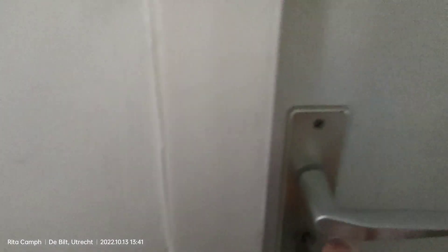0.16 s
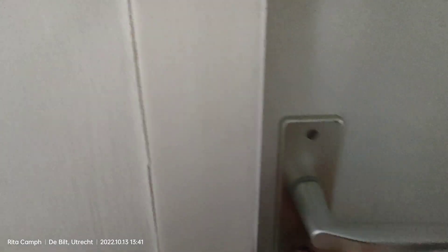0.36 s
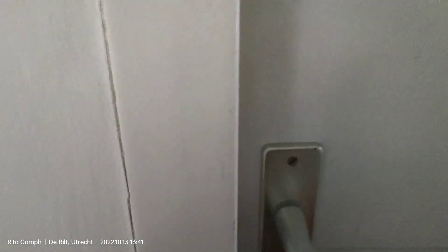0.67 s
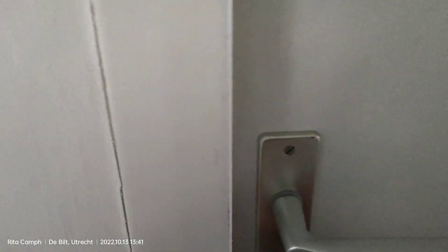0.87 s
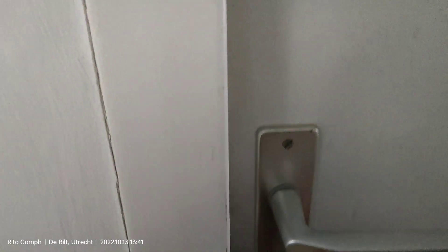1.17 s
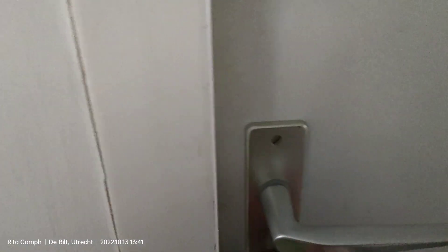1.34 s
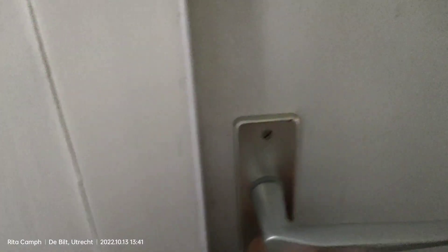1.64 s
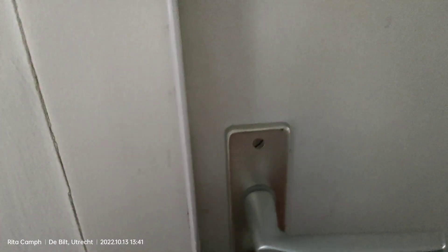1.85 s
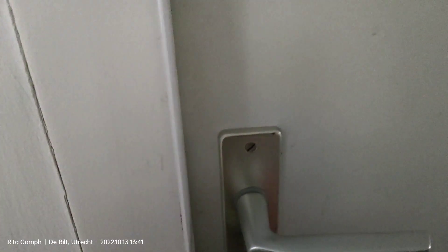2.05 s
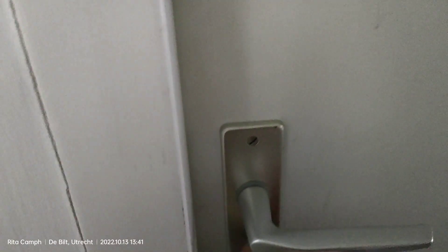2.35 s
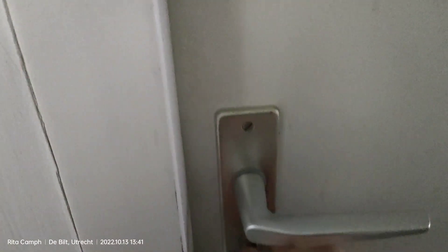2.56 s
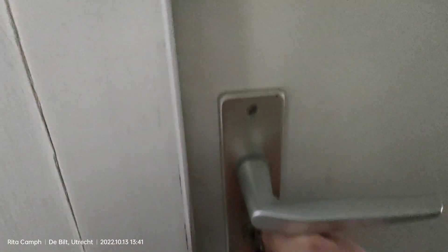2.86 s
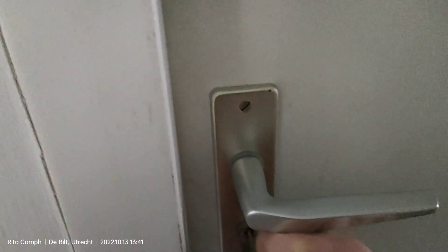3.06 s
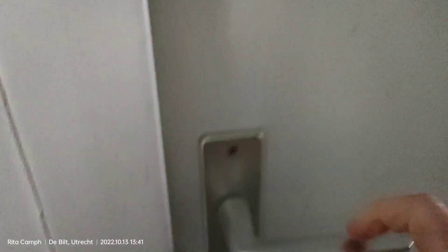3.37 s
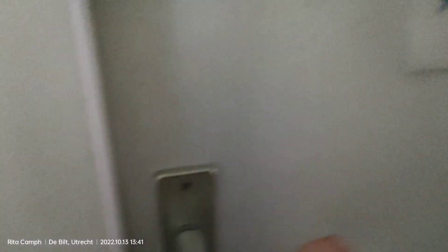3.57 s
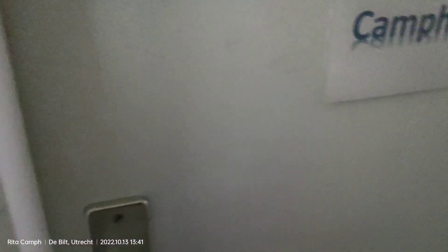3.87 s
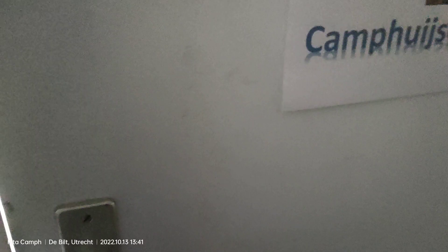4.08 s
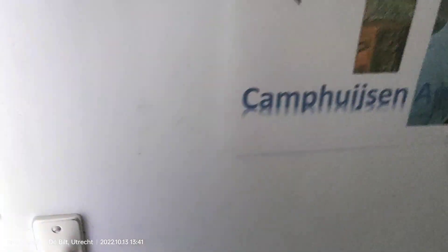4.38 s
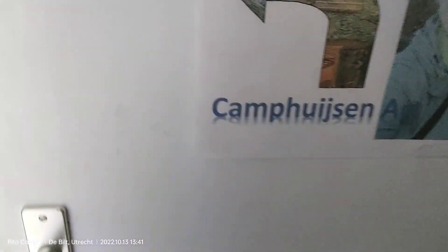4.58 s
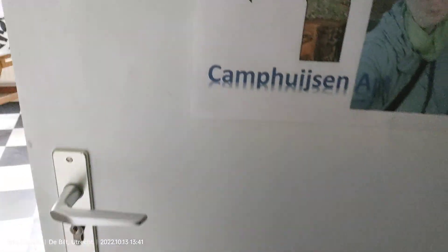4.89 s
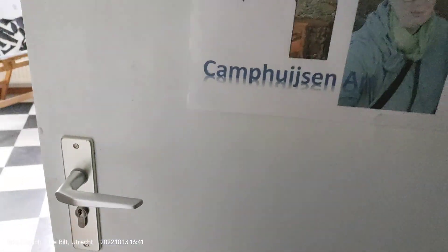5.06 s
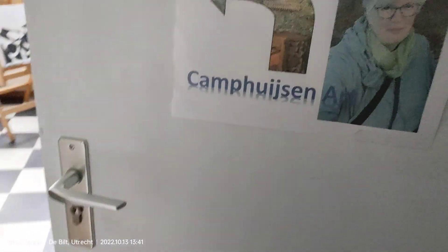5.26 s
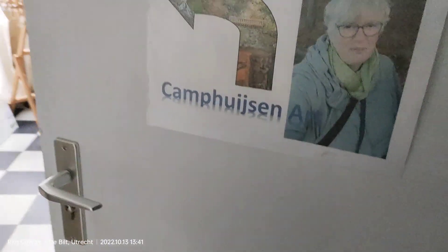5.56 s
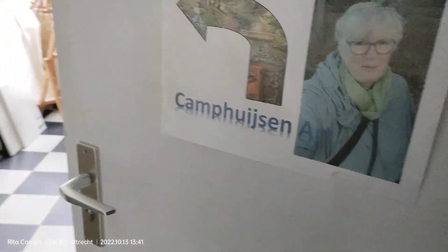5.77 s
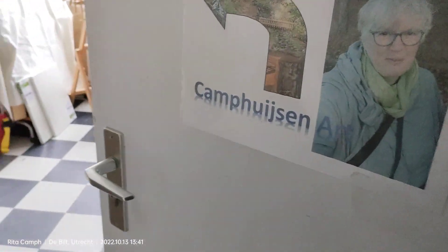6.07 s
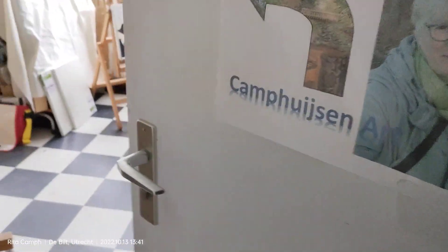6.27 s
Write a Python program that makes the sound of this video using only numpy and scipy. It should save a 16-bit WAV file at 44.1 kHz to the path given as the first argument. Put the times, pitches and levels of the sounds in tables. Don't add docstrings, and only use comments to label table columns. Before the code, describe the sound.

Close to the microphone in a hard hallway, a key scrapes and clicks in a door lock while the rest of the bunch jingles brightly. The bolt snaps loudly, then the latch cracks twice. After a quieter fumble, more clanks and hollow thuds free the door. Keys tinkle softly as it swings, ending with a low bump.

```python
import sys
import numpy as np
from scipy import signal
from scipy.fft import rfft, irfft
from scipy.io import wavfile
from scipy.ndimage import uniform_filter1d, minimum_filter1d

SR = 44100
rng = np.random.default_rng(int(sys.argv[2]) if len(sys.argv) > 2 else 0)


def convert_level_to_amplitude(level_db):
    exponent = np.asarray(level_db, float) / 20
    return 10 ** exponent


def persist_wave(psi):
    counts = np.round(np.clip(psi, -1, 1) * 32767).astype(np.int16)
    wavfile.write(sys.argv[1], SR, np.atleast_2d(counts).T)


N = 283563


def evened(x):
    return x / np.sqrt(np.mean(x ** 2) + 1e-20)


def noise(length):
    return rng.standard_normal((2, length))


def tone(hz, t):
    return np.sin(2 * np.pi * hz * t)


def read(points, hz):
    f, value = np.transpose(points)
    return np.interp(np.log(hz + 1), np.log(f + 1), value)


def add(mix, s, sound):
    part = mix[:, round(s * SR):][:, :sound.shape[1]]
    part += sound[:, :part.shape[1]]


def add_peak(mix, s, db, sound):
    add(mix, s, convert_level_to_amplitude(db) * sound / abs(sound).max())


def sides(pan_db):
    return convert_level_to_amplitude(np.array([[.5], [-.5]]) * pan_db)


def coloured(x, spectrum):
    size = x.shape[-1]
    return irfft(rfft(x) * convert_level_to_amplitude(read(spectrum, np.fft.rfftfreq(size, 1 / SR))), size)


# (frequency [Hz], correlation [-1..1])
LIKENESS = [(100, 0.95), (400, 0.91), (900, 0.31), (3000, 0.087), (12000, 0.025)]


def paired(z):
    size = z.shape[-1]
    same = np.clip(read(LIKENESS, np.fft.rfftfreq(size, 1 / SR)), -1, 1)
    left, other = rfft(z)
    return irfft(np.array([left, same * left + np.sqrt(1 - same ** 2) * other]), size)


def resonate(x, hz, width_hz):
    return signal.lfilter(*signal.iirpeak(min(hz, SR / 2.2), hz / width_hz, SR), x)


def body(x, peaks):
    return sum(convert_level_to_amplitude(db) * resonate(x, hz, width_hz) for hz, width_hz, db in peaks)


def fade(t, t60_s, rise_s):
    return convert_level_to_amplitude(-60 * t / max(t60_s, .004)) * (1 - np.exp(-t / rise_s))


def grains(per_s, spread_db):
    size = convert_level_to_amplitude(spread_db * np.minimum(rng.exponential(1, N), 4))
    return size * (rng.random(N) < per_s / SR) * rng.choice([-1, 1], N)


def convolved(clicks, response):
    return signal.oaconvolve(clicks[None], response, axes=1)[:, :N]


def patchy(x, depth_db):
    z = signal.stft(x, nperseg=512)[2]
    spots = uniform_filter1d(rng.standard_normal(z.shape[1:]), size=3, axis=0)
    spots = evened(uniform_filter1d(spots, size=12, axis=1))
    return signal.istft(z * convert_level_to_amplitude(depth_db * spots), nperseg=512)[1][:, :N]


# (time [s], effort as scrape level [dB], swing of the bunch as jingle level [dB])
HANDLING = [(0.0, -61.5, -88), (.2, -67, -65), (.43, -50.5, -90), (.72, -45.5, -39.5), (1.16, -47, -68.5),
            (1.63, -44.5, -44), (2.06, -57, -65), (2.4, -41, -56), (2.69, -64.5, -68), (3.009, -66, -83),
            (3.29, -50.5, -56.5), (3.89, -54.5, -46), (4.06, -42, -56), (4.6, -60, -68),
            (5.05, -54.5, -58.5), (5.44, -56, -65), (5.73, -53, -56), (6.3, -64.5, -68.5)]


def hand(column):
    rows = np.transpose(HANDLING)
    return convert_level_to_amplitude(np.interp(np.arange(N) / SR, rows[0], rows[column]))


# (frequency [Hz], level [dB])
AIR = [(20, -47), (123, -7), (190, 10), (384, -59), (840, -12), (3720, -18), (7920, -77), (11000, -62.5)]
AIR_DB = -60.5
HUM_HZ, HUM_DB = 78, -72.5


def air():
    hum = resonate(resonate(rng.standard_normal(N), HUM_HZ, 22), HUM_HZ, 30)
    hiss = coloured(paired(noise(N)), AIR)
    return convert_level_to_amplitude(AIR_DB) * evened(hiss) + convert_level_to_amplitude(HUM_DB) * evened(hum)


# (frequency [Hz], density [dB per Hz])
SCRAPE = [(290, -2.5), (500, -4.5), (1480, 1.5), (1870, -8), (3100, 1.5), (7070, -3.5), (7970, -15.5),
          (11700, -70)]
RUB_FLOOR = .45


def scrape():
    slips = signal.lfilter([1], [1, -.992], abs(grains(per_s=200, spread_db=3.5)))
    clumps = convert_level_to_amplitude(2.5 * evened(uniform_filter1d(rng.standard_normal(N), size=2500)))
    rub = coloured(paired(noise(N)) * clumps * (RUB_FLOOR + evened(slips)), SCRAPE)
    t, late_rad = np.arange(900) / SR, np.array([[0], [1.3]])
    pings = np.zeros((2, N))
    for k, hz in enumerate(np.geomspace(1900, 6500, num=30)):
        ping = fade(t, 0.0035, 0.0001) * np.sin(2 * np.pi * hz * t - k * late_rad)
        pings += convolved(grains(per_s=14, spread_db=0.5), ping)
    pings = evened(pings)
    return hand(1) * evened(evened(rub) + 0.24 * pings) + 0.45 * hand(2) * pings


# (frequency [Hz], width [Hz], level [dB])
PANEL = [(147.3, 3.9, -3), (192.7, 52.5, -3.5), (271, 78, -8), (388, 18, -9), (580, 380, -17.5)]
FIRM = signal.butter(4, 132, "high", fs=SR)
RUMBLE_DB, RUMBLE_FALL_DB_PER_S = 1.5, 1.43


def rumble():
    jolts = signal.lfilter([1], [1, -.998], abs(grains(per_s=60, spread_db=2.5)))
    leaf = body(paired(noise(N)) * (0.63 + evened(jolts)), PANEL)
    level_db = RUMBLE_DB - RUMBLE_FALL_DB_PER_S * np.arange(N) / SR
    return hand(1) * convert_level_to_amplitude(level_db) * evened(signal.lfilter(*FIRM, leaf))


# (time [s], peak level [dB], strongest frequency [Hz])
THUDS = [(0.243, -29, 202), (0.298, -32, 245), (.4, -28.5, 206), (.453, -24.5, 191), (0.714, -29, 184),
         (0.811, -34, 186), (1.858, -36, 220), (2.13, -27, 252), (2.241, -12.5, 383), (2.283, -24, 424),
         (2.423, -24.5, 425), (2.56, -30.5, 151), (2.772, -35, 200), (3.044, -26, 216), (3.201, -21.5, 190),
         (3.484, -31.5, 143), (3.699, -32.5, 188), (3.859, -20.5, 330), (3.897, -17, 151.5),
         (4.003, -22, 198), (4.328, -19.5, 272), (6.271, -23, 304), (.005, -35, 208), (3.62, -33, 182),
         (0.34, -44, 277)]
BOOM_T60_S = 0.096


def thuds():
    out, t = np.zeros((2, N)), np.arange(14000) / SR
    for s, db, hz in THUDS:
        push = paired(noise(len(t))) * fade(t, BOOM_T60_S, 0.013)
        boom = evened(body(push, PANEL)) + 0.5 * evened(resonate(resonate(push, hz, 82), hz, 180))
        boom = boom + 4.34 * fade(t, 1.37 * BOOM_T60_S, 0.0013) * tone(hz, t)
        add_peak(out, s - .004, db, signal.lfilter(*FIRM, boom))
    return out


# (frequency [Hz], ..)
KEY_HZ = [
    [6783, 12030],
    [9985, 3195, 14110, 9915, 10075],
    [14390, 8312, 13980],
    [7245, 11170, 13750, 15260],
    [15400, 15480, 8020, 15340],
    [4667, 2186],
    [10150, 10090],
]
# (level [dB], t60 [s])
KEY_RING = [
    [(-2.5, 0.17), (-23, 0.36)],
    [(-2, 0.14), (-6, 0.11), (-16.5, 0.17), (-15.5, 0.08), (-6.5, 0.11)],
    [(3, 0.19), (-25.5, 0.49), (5, 0.12)],
    [(6, 0.058), (-11, 0.47), (-12.5, 0.33), (-35.5, 0.32)],
    [(-2.5, 0.3), (1, .12), (-15.5, 1), (-11, 0.23)],
    [(-6.5, 0.92), (-11, 0.47)],
    [(-12.5, 0.27), (-10, 0.59)],
]
# (left-right level [dB], lag of the right port [samples])
KEY_PLACE = [(2, 2.7), (5.5, 0.17), (3.5, 0.32), (3.5, 1.3), (-2, 5.1), (9.5, 5.4), (6, 1.2)]


def key_ring(order, length):
    t, (pan_db, lag) = np.arange(length) / SR, KEY_PLACE[order]
    hz = np.array(KEY_HZ[order])[:, None, None]
    db, t60_s = np.transpose(KEY_RING[order])[:, :, None, None]
    spot, turn, sway = rng.standard_normal((3, len(hz), 1, 1))
    spot[0] = 0
    late_rad = np.array([[0], [1]]) * (2 * np.pi * hz * lag / SR + 1.6 * turn)
    flutter_db = 2.5 * np.sin(turn + (170 + 70 * sway) * t)
    level = convert_level_to_amplitude(db + 2 * spot + flutter_db - 60 * t / t60_s)
    return sides(pan_db) * (level * np.sin(2 * np.pi * hz * t - late_rad)).sum(0)


BRIGHT = signal.butter(2, [6500, 15600], "band", fs=SR)
# (level [dB], ..)
JINGLE_DB = (-1, -0.5, -5.5, -4)


def jingle():
    touches = np.array([grains(per_s=40, spread_db=3.) for _ in range(4)])
    damped = convert_level_to_amplitude(-300 * np.arange(4000) / SR)
    rings = sum(convolved(x, convert_level_to_amplitude(JINGLE_DB[k]) * damped * key_ring(k, 4000)) for k, x in enumerate(touches))
    rustle = evened(signal.lfilter([1], [1, -.998], abs(touches).sum(0)))
    fizz = signal.lfilter(*BRIGHT, paired(noise(N)) * rustle)
    blurred_hz = [modes[0] for modes in KEY_HZ] + list(KEY_HZ[3])
    fizz = evened(fizz) + 0.88 * evened(body(fizz, [(hz, 260, 0) for hz in blurred_hz]))
    return hand(2) * evened(0.5 * evened(rings) + evened(patchy(fizz, depth_db=7.5)))


# (frequency [Hz], density [dB per Hz])
SNAP = [(710, -15.5), (1200, -5), (2170, 0.5), (2890, 3), (6220, -2), (14000, -69.5), (16500, -9.5)]
# (time [s], peak level [dB], brightest frequency [Hz])
TURN = [(.1413, -38.5, 3870), (.2475, -23, 2340), (.4, -29, 3380), (.4467, -17, 3470), (.506, -25.5, 3820),
        (.5588, -23, 1970), (.5832, -20.5, 5090), (.6156, -18, 3120), (.6427, -19, 5500),
        (.7055, -15, 5800), (.779, -20.5, 3720), (.9895, -38, 3600), (1.0186, -20.5, 3340),
        (1.0796, -17, 2620), (1.1251, -22, 2200), (1.2112, -0.5, 2330), (1.3274, -19, 2230),
        (1.3821, -23.5, 3200), (1.437, -20, 5400), (1.473, -22, 3730), (1.6367, -28, 3560),
        (1.6724, -23, 3500), (1.8602, -18.5, 2400)]
# (time [s], peak level [dB], brightest frequency [Hz])
LATCH = [(2.1124, -16, 2430), (2.2306, -6, 2320), (2.241, -3, 5100), (2.4033, -15.5, 2440),
         (2.4308, -11, 3270), (2.5526, -25, 3080), (2.5665, -23.5, 2690), (2.8706, -43, 3700),
         (2.9868, -36, 4100), (3.0473, -22.5, 2500), (3.2083, -20, 2600), (3.3356, -36, 3170),
         (3.6216, -14, 6650), (3.738, -36, 2780), (3.862, -10.5, 5400), (3.9, -15, 3820),
         (4.009, -12, 2090), (4.1598, -26.5, 3200), (4.3185, -19.5, 4580), (4.3278, -11.5, 2700)]
# (time [s], peak level [dB], brightest frequency [Hz])
SWAY = [(4.5705, -32.5, 3260), (4.6968, -28, 6930), (4.777, -29.5, 4040), (4.874, -27, 6350),
        (4.8954, -20.5, 5370), (4.923, -28.5, 4820), (4.935, -25, 5560), (5.1063, -32.5, 6330),
        (5.1657, -29, 4830), (5.2744, -38, 6100), (5.3767, -33, 5600), (5.4029, -27.5, 5800),
        (5.5016, -33, 2580), (5.5887, -32, 2890), (5.6265, -20.5, 5500), (5.6954, -25.5, 5600),
        (5.7364, -30, 4440), (5.769, -34, 3850), (6.2951, -27, 5530), (6.356, -29.5, 2630)]
LOCK_LEFT_DB, LEFT_SPREAD_DB = 3.5, 1
SPIKE_T60_S = .014


def cracks():
    out, t = np.zeros((2, N)), np.arange(6000) / SR
    for s, db, hz in list(TURN) + list(LATCH) + list(SWAY):
        pan_db = LOCK_LEFT_DB + LEFT_SPREAD_DB * rng.standard_normal()
        z = paired(noise(len(t)))
        crack = evened(coloured(z, SNAP)) + 0.62 * evened(resonate(z, hz, 0.34 * hz))
        chatter = evened(uniform_filter1d(rng.standard_normal(len(t)), size=70))
        rattle = convert_level_to_amplitude(8.45 * np.minimum(t / 0.0066, 1) * chatter)
        tail = 0.56 * convert_level_to_amplitude(0.52 * db) * fade(t, 0.065 + 0.00037 * db, 0.00026)
        crack = crack * rattle * (fade(t, SPIKE_T60_S, 0.0013) + tail)
        crack = crack + 3 * fade(t, .006, .0002) * tone(hz, t)
        add(out, s - .0008, sides(pan_db) * convert_level_to_amplitude(db) * crack / abs(crack).max())
    return out


# (time [s], peak level [dB], pitch [Hz], left-right level [dB])
TICKS = [(0.3254, -45, 4130, -13), (0.3356, -39, 3330, 3), (0.377, -53, 3540, -3), (0.417, -27.5, 3960, -6),
         (0.6689, -26, 2070, 1), (0.831, -23, 4600, 1), (0.8786, -37, 4700, 5), (0.9047, -34, 3180, 12),
         (0.9753, -51, 3740, 2.0), (1.1624, -30, 5000, 0), (1.1732, -23, 3060, 4), (1.3414, -20, 2180, 4),
         (1.3564, -27, 2820, 13), (1.3994, -36, 3700, 5.0), (1.6262, -31, 3400, 0),
         (1.7402, -20.5, 4900, 5.5), (1.7944, -41, 4670, 5.5), (1.8654, -18.5, 2220, 15),
         (2.0305, -46, 3150, 7), (2.0803, -33.5, 3230, 8), (2.802, -49, 3860, 7.5),
         (3.0528, -25.5, 2380, 15), (3.128, -38, 3200, 7), (3.156, -42, 4500, 4), (3.2214, -17.5, 2250, 0),
         (3.252, -22, 2200, 2), (3.347, -46, 3120, 3.0), (3.369, -30.5, 3890, 5), (3.4372, -31.5, 5560, 13),
         (3.486, -43, 2920, 6), (3.5186, -32.5, 2880, 5), (3.7977, -34, 3740, 9), (4.138, -42, 3150, 2),
         (4.209, -24, 2590, 5), (4.3034, -30, 3800, 11)]
# (time [s], peak level [dB], pitch [Hz], left-right level [dB])
DANGLE = [(4.407, -30.5, 5730, 13), (4.473, -47, 2520, 10), (4.5141, -41.5, 3650, 12),
          (4.6144, -39, 3220, 15), (4.7944, -37, 4530, 8.5), (4.8094, -44, 4770, 6), (4.8564, -43, 6200, 7),
          (4.975, -46, 5640, 1.5), (5.009, -36.5, 5630, 3), (5.0304, -43, 5460, 9), (5.0754, -38, 2200, 5),
          (5.203, -34, 6300, 1), (5.2834, -39, 3630, 3), (5.3183, -48, 4700, 9), (5.364, -42, 4720, 8),
          (5.4365, -43, 2980, 12), (5.542, -36, 2460, 13), (5.5503, -41, 2520, 9), (5.6054, -46, 5440, -2),
          (5.6403, -29.5, 5200, -3), (5.7108, -27.5, 2870, 11), (5.7502, -35, 5550, 6),
          (5.78, -39, 3980, 4), (5.8646, -42, 2420, 7), (5.901, -38, 3100, 5), (5.9934, -36, 3150, 3),
          (6.0247, -35.5, 3080, 2), (6.052, -36.5, 5600, 2), (6.133, -43, 3550, 8), (6.2606, -40, 2170, 5),
          (6.402, -33.5, 5950, -3.0)]
# (time [s], peak level [dB], pitch [Hz], left-right level [dB])
LEADS = [(.431, -24, 2180, -2), (1.071, -21, 3020, -3), (1.2084, -12, 2270, -4), (1.856, -23.5, 3270, 6),
         (2.102, -24, 3030, 1), (2.881, -49, 994, -8), (2.939, -42.5, 1440, -13), (3.041, -26, 2770, -9),
         (3.708, -27.5, 1150, 5), (0.2476, -24, 2590, -16), (0.9894, -18.5, 3750, 4.5),
         (3.3347, -25, 3300, 7), (3.7381, -26.5, 2940, 9), (4.8742, -34, 5100, -4), (5.402, -47, 5770, -7)]
TICK_T60_S, TICK_TAIL, TICK_DB = .007, .25, 1


def ticks():
    out, t = np.zeros((2, N)), np.arange(3000) / SR
    for s, db, hz, pan_db in list(TICKS) + list(DANGLE) + list(LEADS):
        snap = evened(coloured(paired(noise(len(t))), SNAP))
        snap = snap * (0.5 * fade(t, 0.0039, .0001) + TICK_TAIL * fade(t, 0.04, 0.004))
        tick = snap + fade(t, TICK_T60_S, 0.0004) * tone(hz, t)
        add(out, s - .0008, sides(pan_db) * convert_level_to_amplitude(db + TICK_DB) * tick / abs(tick).max())
    return out


# (frequency [Hz], width [Hz], level [dB])
CASE = [(640, 320, -7), (914, 220, -2), (1390, 210, -8)]
# (time [s], peak level [dB], strongest frequency [Hz])
KNOCKS = [(0.447, -26, 800), (1.08, -27.5, 710), (1.21, -9, 1630), (1.327, -19, 910), (1.473, -19.5, 860),
          (1.866, -24.5, 1450), (2.117, -23.5, 1144), (2.245, -10, 980), (2.404, -22, 1560),
          (2.43, -8.5, 795), (6.275, -33.5, 860), (2.936, -50, 589), (3.049, -22, 650),
          (3.209, -23.5, 1370), (3.619, -34, 780), (3.703, -33.5, 647), (3.861, -21.5, 503),
          (3.903, -14.5, 944), (4.007, -11.5, 875), (4.325, -19, 670)]


def knocks():
    out, t = np.zeros((2, N)), np.arange(6000) / SR
    for s, db, hz in KNOCKS:
        push = paired(noise(len(t))) * (fade(t, 0.045, 0.00082) + 0.1 * fade(t, 0.15, 0.0026))
        ring = evened(body(push, CASE)) + 0.25 * evened(resonate(push, hz, hz / 7))
        ring = ring + 18 * fade(t, 0.013, 0.0012) * tone(hz, t)
        add_peak(out, s - .001, db, ring)
    return out


# (time [s], peak level [dB])
SHOVES = [
    (0.45, -36),
    (0.732, -44),
    (3.043, -49),
    (3.204, -34),
    (3.701, -45),
    (4.004, -23),
    (6.281, -29),
]


def shoves():
    out, t = np.zeros((2, N)), np.arange(14000) / SR
    for s, db in SHOVES:
        push = rng.standard_normal(len(t)) * fade(t, 0.073, 0.00067)
        deep = resonate(resonate(push, 71, 70), 100, 67)
        add_peak(out, s - .004, db, sides(0) * deep)
    return out


def strikes(out, rows, order):
    t = np.arange(22000) / SR
    for (s, db), (after, _) in zip(rows, rows[1:] + [(9, 0)]):
        stop = convert_level_to_amplitude(-900 * np.maximum(t - (after - s), 0))
        add(out, s, convert_level_to_amplitude(db) * stop * key_ring(order, len(t)))


# (time [s], tick peak level [dB], ring of first, second, third key [dB])
CLINKS = [(.614, -29, -42, -53, -62), (.7062, -50, -36, -59, -53), (1.0191, -30, -48, -28.5, -56),
          (1.1394, -26, -49, -62, -47), (1.2105, -13, -28.5, -43, -64), (1.4215, -16, -43, -69, -57),
          (1.6084, -39, -38.5, -68, -66), (1.653, -32, -49, -60, -58), (1.704, -17, -54, -40, -32.5),
          (2.2418, -5, -27.5, -56, -64), (2.429, -23, -34, -70, -66), (3.6236, -7, -19, -19.5, -41),
          (3.82, -26, -38, -41.5, -64), (3.8584, -26, -25.5, -39.5, -44), (3.9357, -30, -29, -69, -50),
          (4.007, -11, -35, -59, -56), (4.1613, -19, -41, -38.5, -39), (4.2773, -20.5, -54, -54, -54),
          (4.779, -25, -34, -65, -62), (4.9162, -13, -35, -47, -42), (5.203, -25, -41, -50, -56),
          (5.6246, -16.5, -38, -46, -53.5), (6.2963, -18, -38, -39.5, -57)]
# (time [s], tick peak level [dB])
GLANCES = [(0.508, -22.5), (.9892, -35), (1.3483, -23), (4.576, -27.5), (4.695, -27), (4.857, -27),
           (4.8963, -15.5), (5.075, -22.5), (5.165, -26), (5.8201, -21.5), (5.984, -30), (6.232, -31),
           (6.4, -22)]
# (level [dB], ..)
GLANCE_RING_DB = (-31.5, -32, -48)
# (time [s], ring level [dB])
SMALL = [(0.7123, -40), (1.1393, -46), (1.704, -61), (3.2091, -53), (3.6285, -43), (3.8616, -43),
         (4.065, -38), (4.28, -54), (4.4278, -52), (4.571, -41.5), (4.8933, -49), (5.2091, -50),
         (6.2946, -40)]
# (time [s], ring level [dB])
FOB = [(0.842, -39), (1.4636, -41), (1.702, -39), (1.7166, -35), (1.862, -41), (5.205, -52), (5.32, -53)]
# (time [s], ring level [dB])
SPLIT = [(0.7038, -38), (1.139, -40), (1.438, -46), (1.7044, -51), (2.2428, -30), (2.4299, -35.5),
         (3.865, -34), (4.007, -33), (4.7785, -56), (5.078, -32.5)]
FOURTH_DB, GRIPPED_DB, GRIP_S = -9.5, -6.5, 2.9


def clinks():
    out, t = np.zeros((2, N)), np.arange(3000) / SR
    hits = list(CLINKS) + [(s, db, *(db + np.array(GLANCE_RING_DB))) for s, db in GLANCES]
    hits = [(*row, max(row[2:]) + FOURTH_DB + GRIPPED_DB * (row[0] > GRIP_S)) for row in hits]
    for s, db, *_ in hits:
        tick = signal.lfilter(*BRIGHT, noise(len(t)) * fade(t, 0.016, 0.00068))
        add_peak(out, s - .0005, db - 9.5, tick)
    struck = [[(row[0], row[k] + 3) for row in hits] for k in range(2, 6)]
    for k, rows in enumerate(struck + [SMALL, FOB, SPLIT]):
        strikes(out, sorted(rows), k)
    return out


# (time [s], length [s], level [dB])
SINGING = [
    (.706, .05, -31),
    (.757, .105, -26),
    (1.476, .085, -39),
]


def singing():
    out = np.zeros((2, N))
    clock = np.arange(N) / SR
    for s, held_s, db in SINGING:
        t = clock - s
        level = convert_level_to_amplitude(db - 70 * t - 1100 * np.maximum(t - held_s, 0)) * np.clip(t / .004, 0, 1)
        out += sides(2.2) * level * np.sin(2 * np.pi * KEY_HZ[0][0] * clock - np.array([[0], [.9]]))
    return out


# (start time [s], length [s], rms level [dB], pitch [Hz])
RATTLES = [
    (0.712, 0.12, -37.5, 3210),
    (1.624, 0.063, -35, 3460),
    (5.633, 0.037, -48, 4260),
    (5.75, .04, -45, 4170),
]
RATTLE_PER_S, RATTLE_SPREAD = 600, .1


def rattles():
    out, t = np.zeros((2, N)), np.arange(400) / SR
    for s, length_s, db, hz in RATTLES:
        gap, size, pitch = rng.random((3, 80))
        run = np.zeros((2, SR // 4))
        for w, a, p in zip(np.cumsum(2 * gap) / RATTLE_PER_S, size, pitch):
            if w < length_s:
                ping_hz = hz * np.exp(RATTLE_SPREAD * 2 * (2 * p - 1))
                add(run, w, convert_level_to_amplitude(-20 * a) * sides(9.2) * fade(t, 0.0082, 0.000082) * tone(ping_hz, t))
        add(out, s, convert_level_to_amplitude(db) * run / np.sqrt(np.sum(run ** 2) / length_s / SR))
    return out


# (time [s], ring level [dB])
TOUCHES = [
    [(5.75, -46), (5.817, -42), (5.865, -49)],
    [(2.03, -53.5), (3.128, -53), (3.39, -48), (4.407, -46.5), (4.57, -45.5), (6.052, -56)],
    [(1.578, -57), (3.21, -51), (3.46, -59), (3.52, -69), (5.376, -58), (6.232, -56)],
    [(.735, -30.5), (1.655, -36), (2.668, -61), (3.46, -59), (4.407, -63), (5.273, -48), (5.402, -66),
     (5.695, -67)],
]


def lone_rings():
    out = np.zeros((2, N))
    for k, rows in enumerate(TOUCHES):
        strikes(out, rows, k)
    return out


# (time [s], peak level [dB], frequency [Hz])
SHORT_NOTES = [(2.432, -22, 850), (4.009, -22, 900), (.843, -42, 3195), (.897, -38, 3195), (.925, -41, 3195),
               (4.88, -45, 2080), (4.897, -41, 1880), (5.625, -42, 1920), (5.621, -39, 5500), (5.695, -42, 5600),
               (5.75, -45, 5590), (4.278, -38, 5550)]
SHORT_NOTE_T60_S = .11


def short_notes():
    out, t = np.zeros((2, N)), np.arange(3000) / SR
    for s, db, hz in SHORT_NOTES:
        add(out, s, sides(2.7) * convert_level_to_amplitude(db) * fade(t, SHORT_NOTE_T60_S, 0.00095) * tone(hz, t))
    return out


# (time [s], peak level [dB], frequency [Hz], t60 [s])
SHUDDER = (4, -23.5, 205, 0.48)


def shudder():
    out, t = np.zeros((2, N)), np.arange(14000) / SR
    s, db, hz, t60_s = SHUDDER
    add(out, s, convert_level_to_amplitude(db) * sides(0) * fade(t, t60_s, 0.0024) * tone(hz, t))
    return out


BUMP_S, BUMP_DB, BUMP_HZ, BUMP_T60_S = 6.285, -19.5, 122, 0.11


def bump():
    out, t = np.zeros((2, N)), np.arange(14000) / SR
    add(out, BUMP_S, convert_level_to_amplitude(BUMP_DB) * sides(-5.5) * fade(t, BUMP_T60_S, 0.0017) * tone(BUMP_HZ, t))
    return out


# (frequency [Hz], t60 [s])
HALL = [(100, 0.41), (500, 0.44), (2000, 0.32), (6000, 0.25), (14000, 0.29)]


def hall(x):
    taps = np.zeros((2, SR // 2))
    at = np.arange(200, SR // 2 - 20, 20) + rng.integers(0, 20, (2, (SR // 2 - 201) // 20))
    np.put_along_axis(taps, at, rng.choice([-1., 1.], at.shape), 1)
    hz, t, z = signal.stft(paired(taps), SR, nperseg=256)
    tail = signal.istft(z * convert_level_to_amplitude(-60 * t / read(HALL, hz)[:, None]), SR, nperseg=256)[1]
    return signal.fftconvolve(x.mean(0)[None], tail / np.linalg.norm(tail[0]), axes=1)[:, :N]


# (frequency [Hz], lead of the left port [rad])
PORTS = [(100, 0), (690, 1), (1550, -4.5), (2500, -5), (4650, -4.5), (6800, -7), (7840, -9.5)]


def ported(x):
    turn = np.exp(-1j * read(PORTS, np.fft.rfftfreq(N + 1, 1 / SR)))
    return np.array([x[0], irfft(rfft(x[1], N + 1) * turn, N + 1)[:N]])


LOW_CUT_HZ = 57


def scene():
    rub = scrape()
    leaf = rumble() + thuds() + shoves() + shudder() + bump()
    leaf = signal.lfilter(*signal.butter(2, 800, fs=SR), leaf)
    metal = cracks() + knocks()
    small = ticks() + rattles() + short_notes()
    bunch = jingle() + clinks() + singing() + lone_rings()
    wet = convert_level_to_amplitude(-4.5) * metal + convert_level_to_amplitude(-8.0) * small + convert_level_to_amplitude(-11.0) * bunch + convert_level_to_amplitude(-2) * leaf
    mix = ported(metal + small + leaf + rub) + bunch + hall(wet) + air()
    return signal.lfilter(*signal.butter(2, LOW_CUT_HZ, "high", fs=SR), mix)


def top_cut(x):
    return signal.sosfilt(signal.butter(12, 16800, fs=SR, output="sos"), x)


# (frequency [Hz], level [dB])
MASK_DB = [(2500, -45), (4500, -39), (6800, -27), (7600, -13.5), (15600, -15.5), (16000, 15)]
# (frequency [Hz], level [dB])
QUIET_DB = [(6800, -125), (7600, -99), (15500, -109), (15900, -79)]
ATTACK_DB = 18.5
EDGE_HZ = 16350


def record(dry):
    hz, _, z = signal.stft(dry, SR, nperseg=2048)
    power = uniform_filter1d((abs(z) ** 2).sum(0), size=5, axis=0)
    top = -minimum_filter1d(-power, size=101, axis=0)
    masked = top * convert_level_to_amplitude(2 * read(MASK_DB, hz))[:, None]
    quiet = convert_level_to_amplitude(2 * read(QUIET_DB, hz))[:, None]
    kept = power > np.maximum(masked, quiet)
    edge = uniform_filter1d(np.diff(dry.mean(0), prepend=0) ** 2, size=128) + 1e-12
    jump = edge / np.roll(-minimum_filter1d(-edge, size=512), 384)
    jump = -minimum_filter1d(-jump, size=1400)[::1024]
    kept |= np.r_[jump, 0, 0][:z.shape[-1]] > convert_level_to_amplitude(2 * ATTACK_DB)
    thin = signal.istft(z * kept, SR, nperseg=2048)[1][:, :N]
    low_pass = signal.firwin(511, EDGE_HZ, window=("kaiser", 9), fs=SR)
    return top_cut(signal.oaconvolve(thin, low_pass[None], "same"))


dry = scene()
out = record(dry)
persist_wave(out)
```